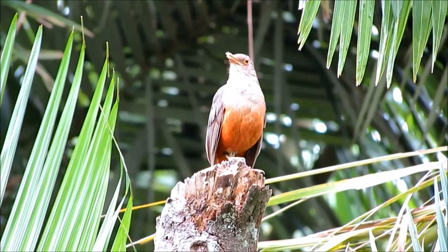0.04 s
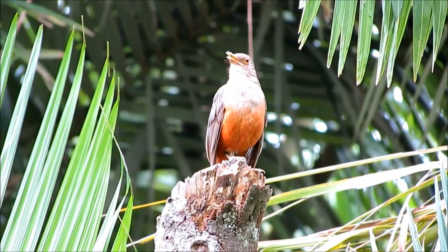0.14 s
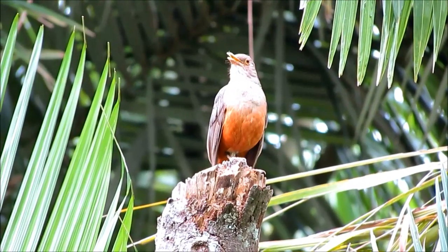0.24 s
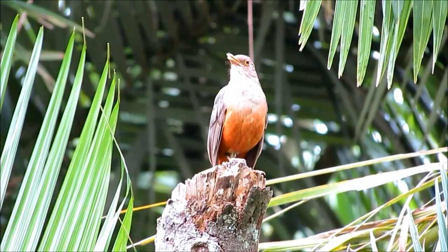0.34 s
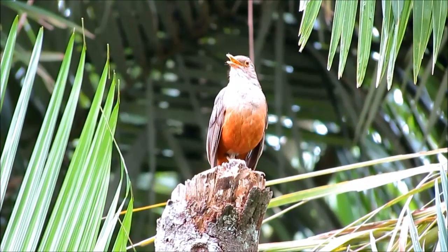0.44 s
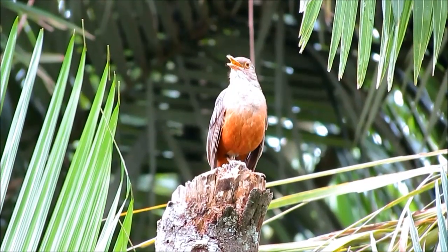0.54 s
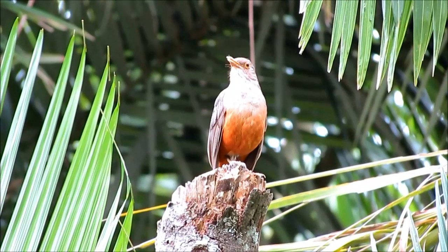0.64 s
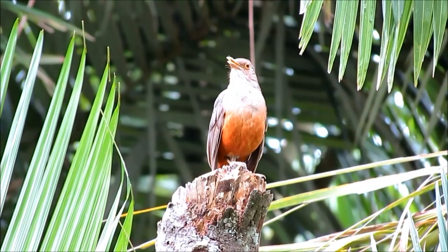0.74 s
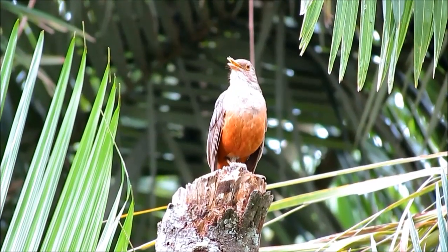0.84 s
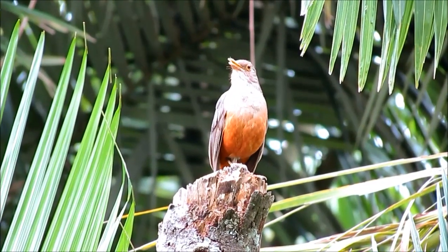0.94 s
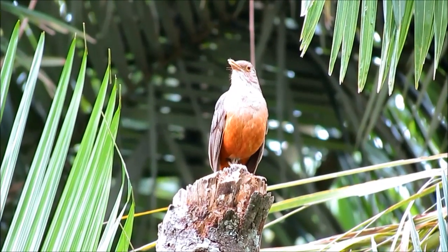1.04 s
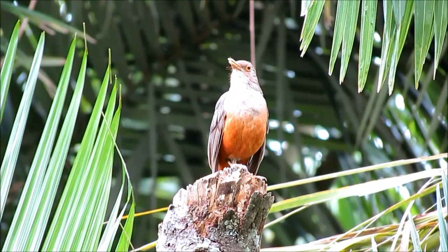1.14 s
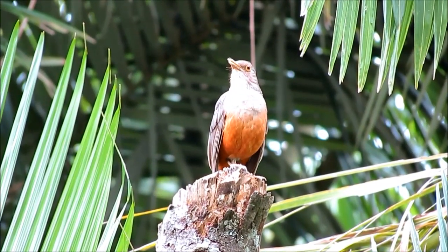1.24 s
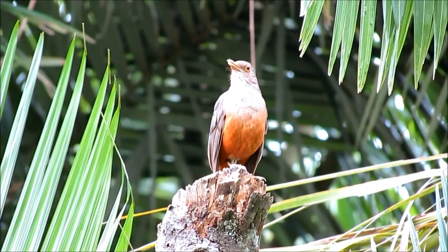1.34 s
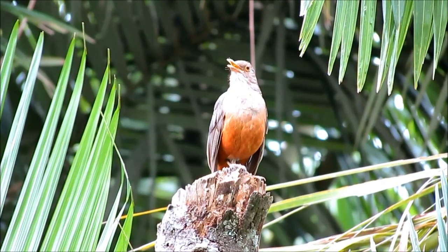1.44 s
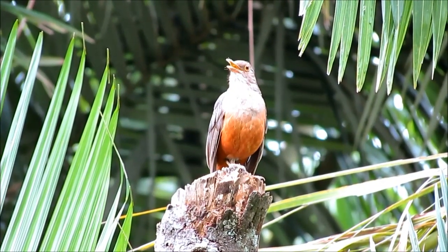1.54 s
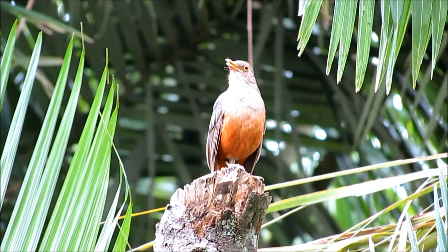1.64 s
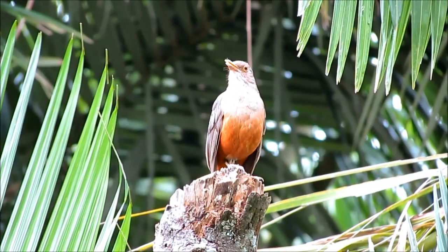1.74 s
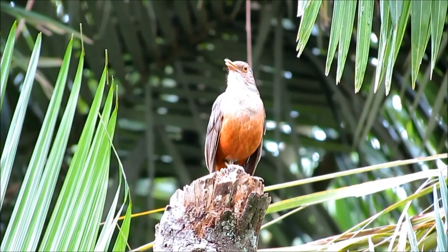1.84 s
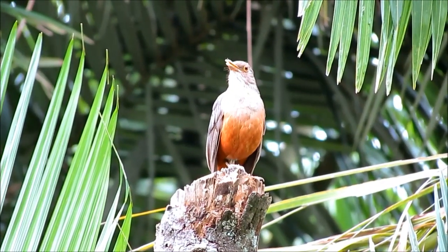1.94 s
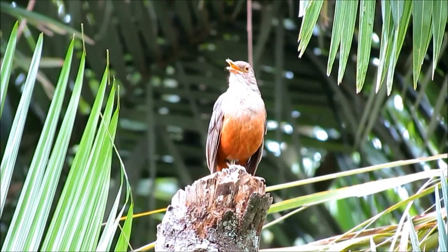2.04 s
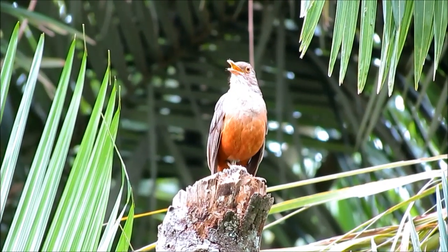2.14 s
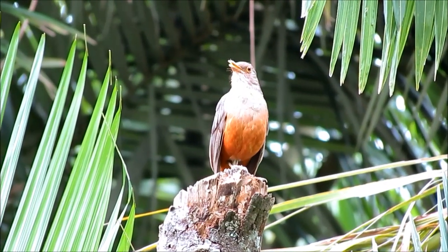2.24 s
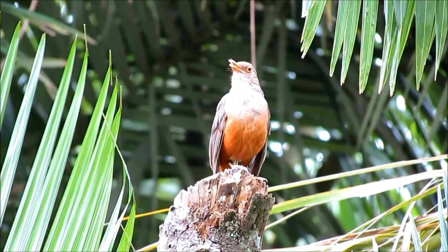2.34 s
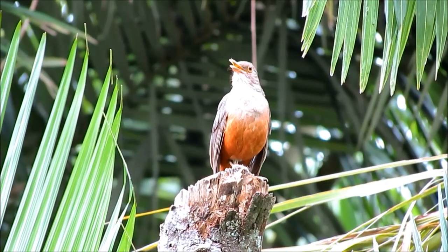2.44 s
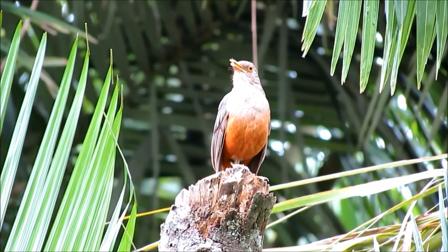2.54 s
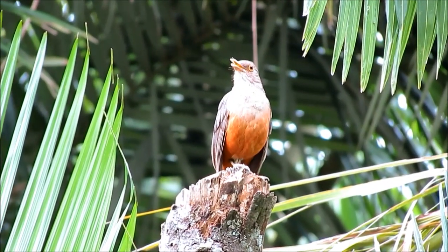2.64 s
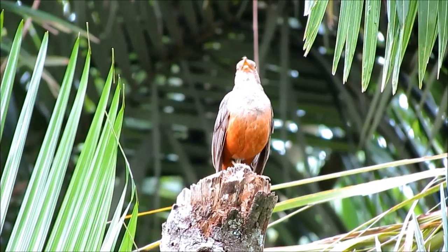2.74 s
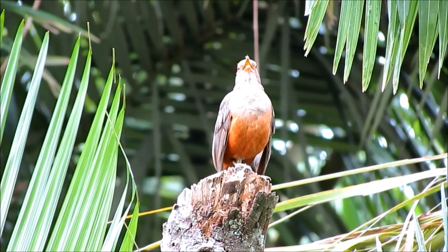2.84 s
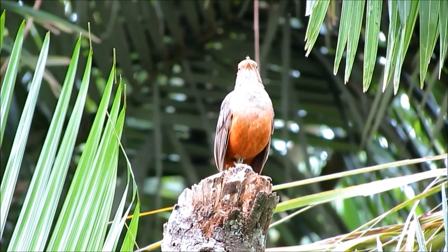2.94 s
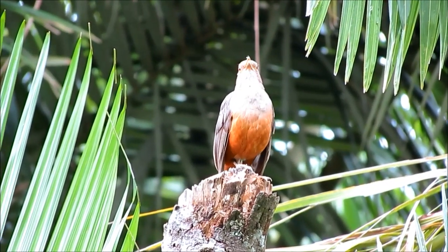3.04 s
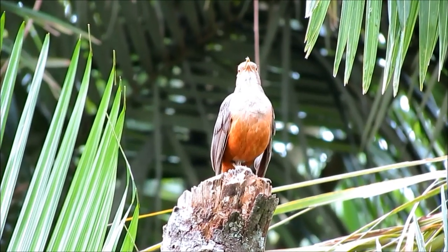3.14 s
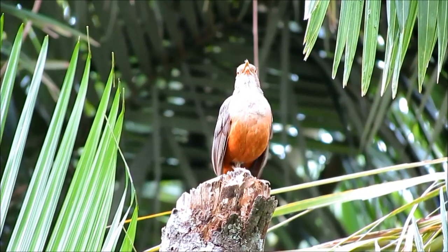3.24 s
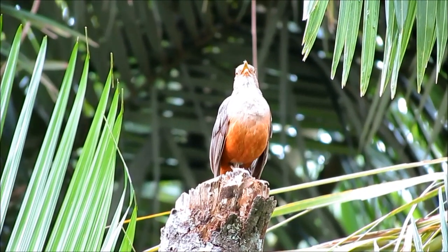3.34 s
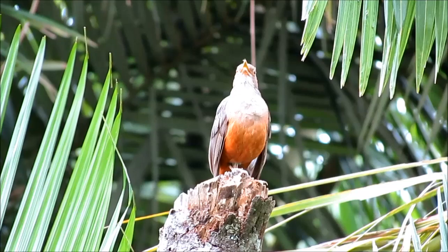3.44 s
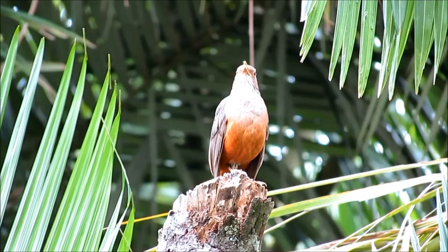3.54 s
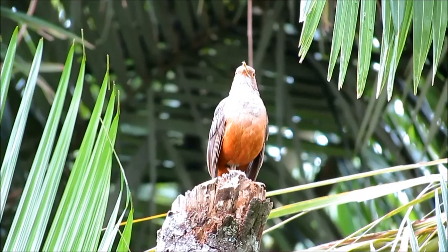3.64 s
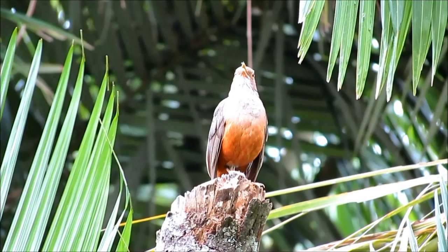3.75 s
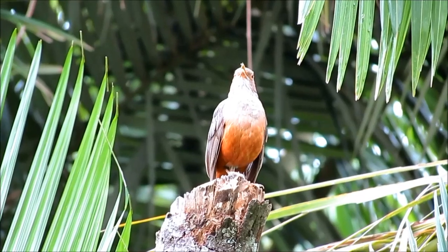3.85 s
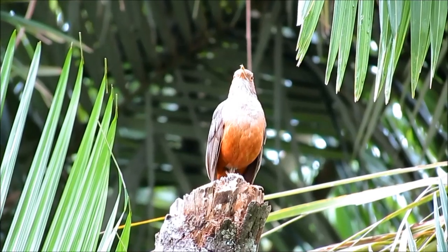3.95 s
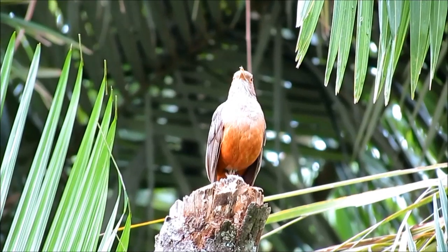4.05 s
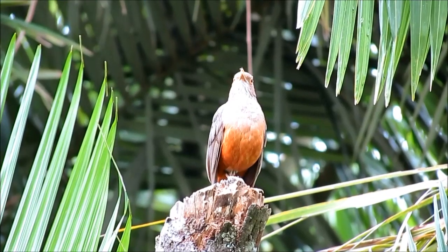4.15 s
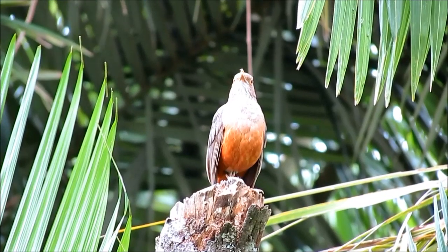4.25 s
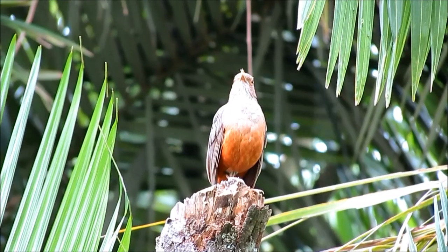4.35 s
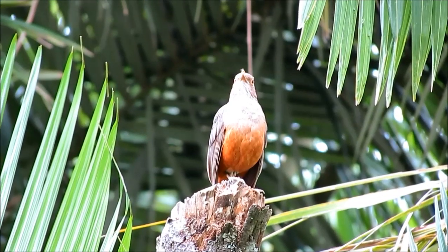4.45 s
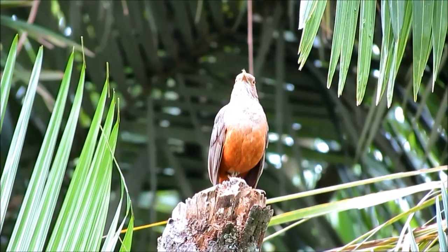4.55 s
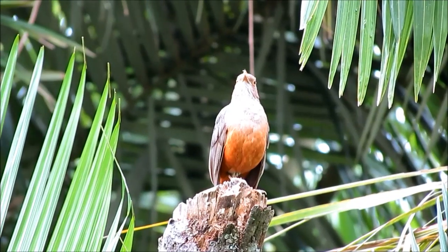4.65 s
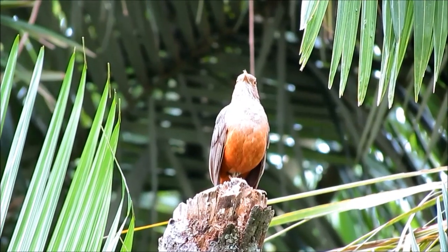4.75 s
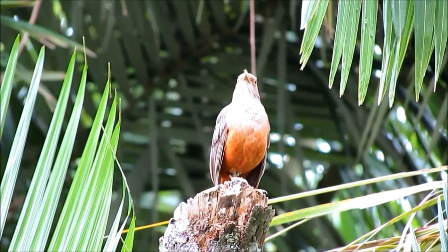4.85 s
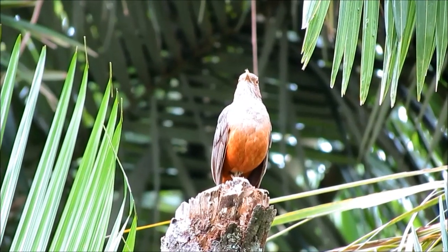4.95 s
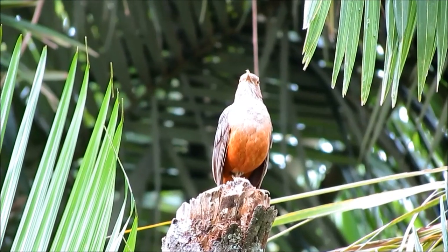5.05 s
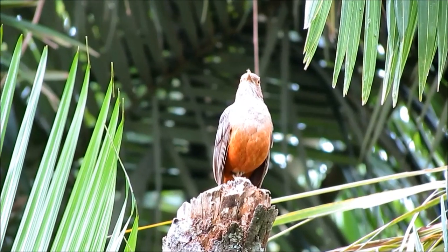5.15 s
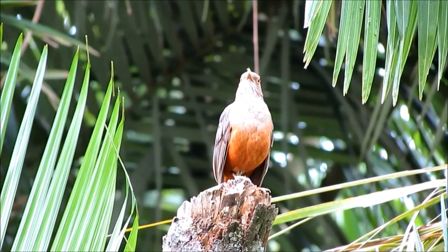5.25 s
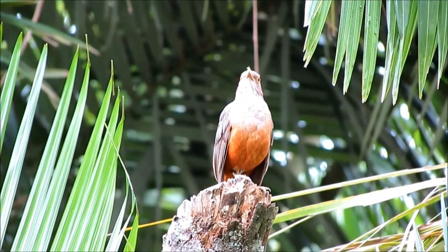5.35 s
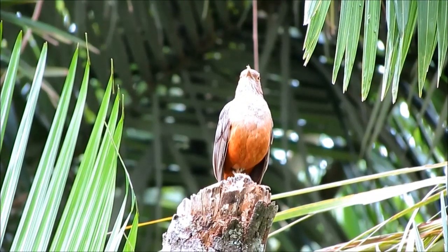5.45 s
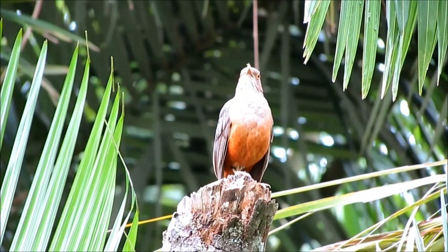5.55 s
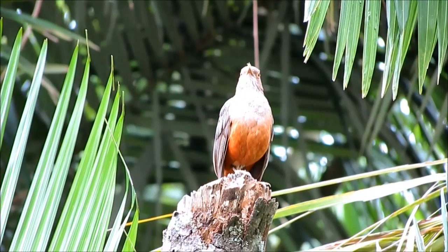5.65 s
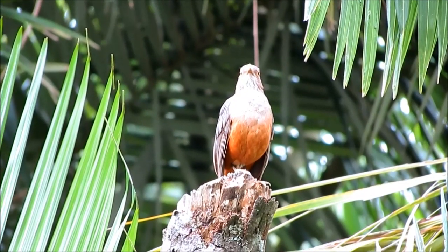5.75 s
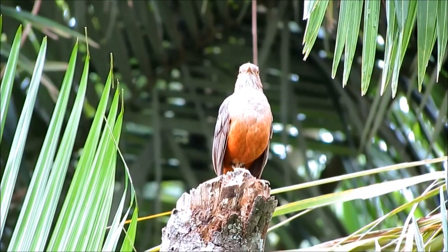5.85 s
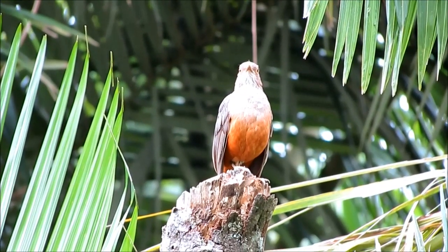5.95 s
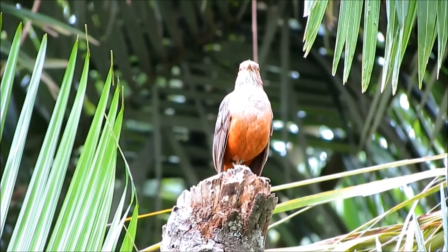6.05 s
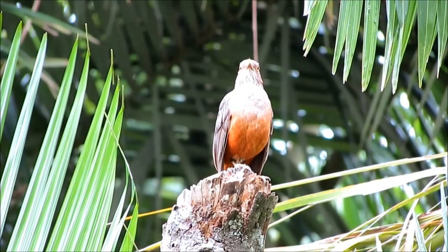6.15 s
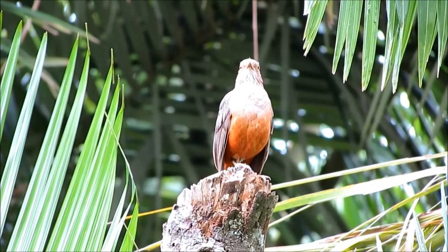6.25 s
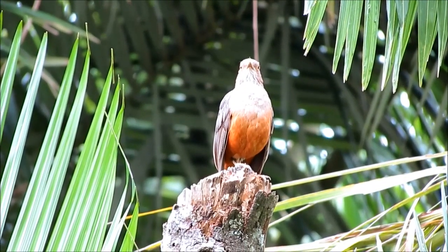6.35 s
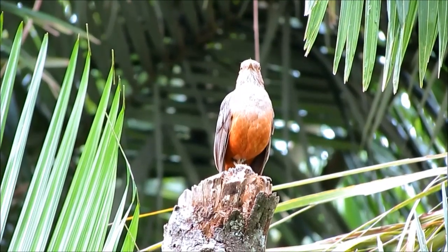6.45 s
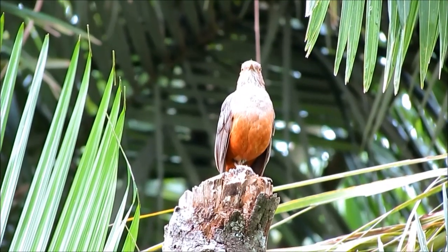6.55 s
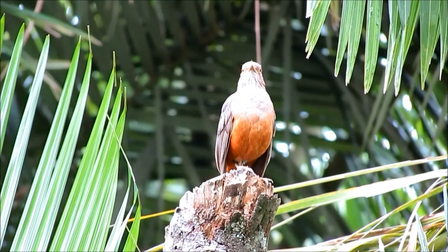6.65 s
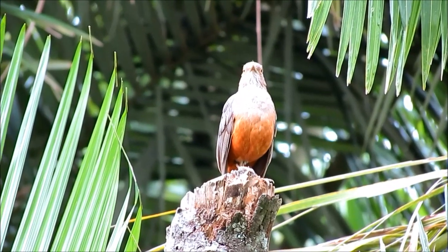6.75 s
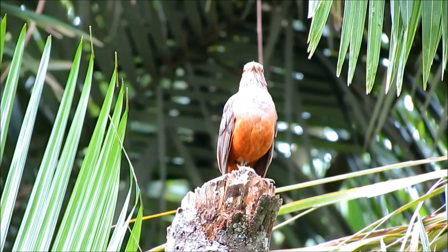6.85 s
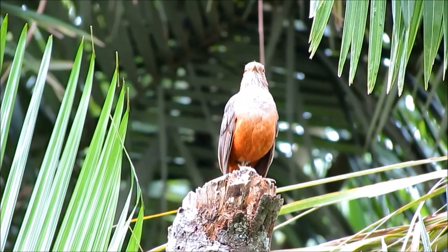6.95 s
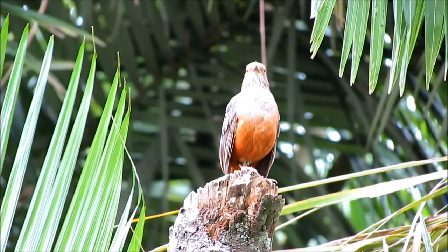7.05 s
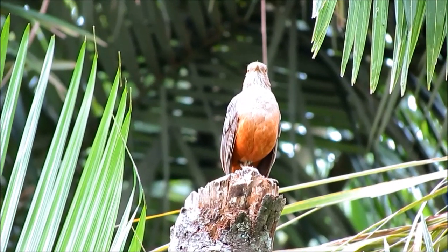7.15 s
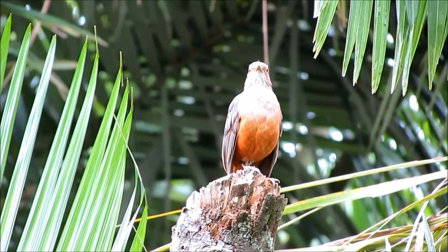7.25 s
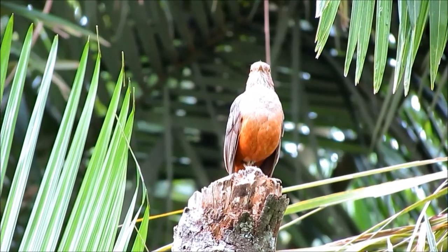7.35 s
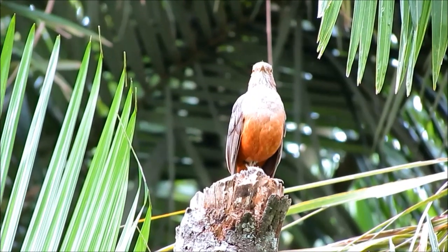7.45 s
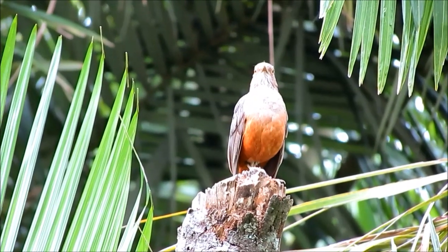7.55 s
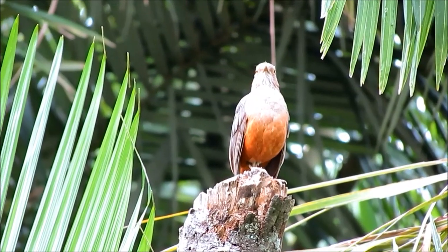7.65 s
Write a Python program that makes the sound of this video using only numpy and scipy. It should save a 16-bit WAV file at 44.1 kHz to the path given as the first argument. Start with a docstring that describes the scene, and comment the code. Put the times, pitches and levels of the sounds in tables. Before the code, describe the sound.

Outdoors among foliage, low airy hush lies under a fluting thrush whose slurred syllables follow with tiny gaps for nearly four seconds. Bright falling chips from small birds sound sharply at first, thin out, then take over after the song ends. A double hollow knock comes early and another late; occasional dry ticks, small distant yelps on the left and faint rapid twittering fill the stereo space, with short diffuse echoes.

```python
"""A thrush sings fluted, trilled notes (bent whistles) over thin, mostly falling chips of small birds (sine sweeps).
A small dog yelps some way off (harmonics plus rasp); knocks and dry clicks sound (coloured noise bursts).
Behind lie far twitter (fast slurs), faint far calls (sine glides) and the low hush of the yard (noise, hum).
Delayed copies of thrush and chips give the ground bounce; sparse decaying taps scatter all but the hush
off the foliage."""
import sys
import numpy as np
from scipy import signal
from scipy.fft import rfft, irfft, next_fast_len
from scipy.io import wavfile

SR = 44100
rng = np.random.default_rng(int(sys.argv[2]) if len(sys.argv) > 2 else 0)


def output_pcm(signal):
    """Save a mono or channel-first signal as 16-bit PCM at the path in sys.argv[1].

    Samples are clipped to [-1, 1] before scaling.
    """
    pcm = np.clip(np.atleast_2d(signal).T, -1, 1) * 32767
    wavfile.write(sys.argv[1], SR, np.round(pcm).astype(np.int16))


N = 339129
TIME = np.arange(N) / SR
GROUND_S = 0.0136  # extra travel time of the path off the ground


def amp(db):
    """Decibels to gain."""
    return 10 ** (np.asarray(db) / 20)


def unit(x):
    """Scales to rms 1."""
    return x / np.sqrt(np.mean(x ** 2) + 1e-20)


def read(points, hz):
    """Interpolates a table on a log-frequency axis."""
    f, value = np.transpose(points)
    return np.interp(np.log(hz + 1), np.log(f + 1), value)


def colour(x, spectrum):
    """Filters a sound by a dB spectrum, at rms 1."""
    size = x.shape[-1]
    padded = next_fast_len(size)
    gain = amp(read(spectrum, np.fft.rfftfreq(padded, 1 / SR)))
    return unit(irfft(rfft(x, padded) * gain, padded)[..., :size])


def drift(t, rate_hz):
    """Random values, rate_hz a second, joined by straight lines."""
    knots = rng.standard_normal(4096)
    return np.interp((t - t[0]) * rate_hz, np.arange(len(knots)), knots)


def sine(hz):
    """Sine that follows a pitch curve."""
    return np.sin(2 * np.pi * np.cumsum(hz) / SR)


def fall(t, t60_s):
    """Exponential decay, 60 dB in t60_s."""
    return np.exp(-np.log(1000) * t / t60_s)


def pan(db):
    """Left and right gains for a level difference; positive is left."""
    return unit(amp([[db / 2], [-db / 2]]))


def add(mix, s, sound):
    """Mixes a sound in at time s."""
    part = mix[..., max(round(s * SR), 0):][..., :sound.shape[-1]]
    part += sound[..., :part.shape[-1]]


def delayed(x, s):
    """The sound s seconds later."""
    return np.pad(x, ((0, 0), (max(round(s * SR), 0), 0)))[:, :N]


def envelope(t, attack_s, release_s, change_db):
    """Soft attack, a hold that swells or fades through 0 dB at its middle, soft release."""
    ramp = np.minimum(t / attack_s, (t[-1] - t) / release_s)
    gate = np.sin(np.pi / 2 * np.clip(ramp, 0, 1)) ** 2
    return gate * amp(change_db * (t / t[-1] - .5))


# decay of the yard: f/Hz, t60/s
YARD_T60 = [(300, 1), (1100, 0.9), (2300, 0.53), (5000, 0.57), (8000, 0.43), (14000, 0.29)]


def foliage(x, near_db, far_db, near_t60_s, first_s=0.0055, shared=0.56):
    """Sparse scatter: nearest leaves share one decay, the whole yard decays by frequency."""
    t = np.arange(SR) / SR
    shape = (2, 3, SR)  # far and near; left, right and shared
    taps = rng.standard_normal(shape) * (rng.random(shape) < .1) * (t > first_s)
    taps = taps[:, :2] + shared * taps[:, 2:]  # part reaches both sides alike
    hz, at_s, z = signal.stft(taps[0], SR, nperseg=256)
    decay = amp(-60 * at_s / read(YARD_T60, hz)[:, None])
    far = signal.istft(z * decay, SR, nperseg=256)[1][:, :SR]
    near = taps[1] * fall(t, near_t60_s)
    echo = (amp(near_db) * unit(near) + amp(far_db) * unit(far)) / np.sqrt(SR)
    return signal.fftconvolve(x, echo, axes=1)[:, :N]


# air spectrum: f/Hz, relative level/dB per Hz
HUSH_SPECTRUM = [(12, -44), (20, -20.5), (49, 3.5), (70, 1.5), (119, -2), (404, -9), (900, -14.5),
                 (1230, -18), (4310, -23.5), (5690, -14.5), (7310, -29), (11700, -32.5), (15500, -38)]
# likeness of the two sides: f/Hz, left-right correlation
HUSH_CORRELATION = [(30, 0.57), (70, -0.64), (170, -0.58), (400, -0.66), (1000, -0.25), (4000, 0.14),
                    (12000, -0.098)]
# low hum: f/Hz, drift rate/Hz, level/dB
HUM_BANDS = [(46, 14, -67.5), (75, 6.7, -56.5)]


def hush(level_db=-45.5, flutter_db=0.57, flutter_hz=3.1):
    """Far town air as partly correlated noise, with a randomly wavering low hum."""
    size = next_fast_len(N)
    a, b = rfft(rng.standard_normal((2, size)))
    same = read(HUSH_CORRELATION, np.fft.rfftfreq(size, 1 / SR))
    right = same * a + np.sqrt(1 - same ** 2) * b
    air = colour(irfft(np.array([a, right]), size)[:, :N], HUSH_SPECTRUM)
    hum = np.zeros((2, N))
    for hz, drift_hz, db in HUM_BANDS:
        for side in hum:
            waver = drift(TIME, drift_hz) + 1j * drift(TIME, drift_hz)
            side += amp(db) * (waver * np.exp(2j * np.pi * hz * TIME)).real
    return air * amp(level_db + flutter_db * drift(TIME, flutter_hz)) * pan(-0.63) + hum


# far single tones: t/s, length/s, first f/Hz, last f/Hz, level/dB
FAR_TONES = [(0, 0.38, 1425, 1345, -62), (1.574, 0.027, 1086, 1050, -53), (1.16, 0.17, 540.5, 554, -59.5),
             (1.549, 0.24, 556.4, 543, -62.5), (3.532, 0.26, 534, 551, -65.5), (4.03, 0.24, 526, 510, -66),
             (4.793, 0.13, 4820, 3400, -61), (5.058, 0.23, 4980, 5000, -61.5),
             (6.7, 0.033, 2470, 2420, -67)]


def far_birds():
    """Low coos and thin glides: soft sine tones that swell and fade."""
    voice = np.zeros(N)
    for s, length_s, first_hz, last_hz, db in FAR_TONES:
        hz = np.linspace(first_hz, last_hz, round(length_s * SR))
        swell = signal.windows.tukey(len(hz), .5)
        add(voice, s, np.sqrt(2) * amp(db) * swell * sine(hz))
    direct = voice * pan(0)
    return direct + foliage(direct, near_db=0, far_db=-2, near_t60_s=.2)


# run starts: t/s
TWITTER_STARTS = [1.381, 1.798, 2.199, 2.58, 3.099, 3.42, 4.02, 4.72, 5.53, 6.12, 6.46, 6.79, 7.13]


def twitter(peak_db=-50, length_s=0.18, rate_hz=44, top_hz=6200, bottom_hz=5100):
    """Far birds: runs of rapid downward sine slurs at a drifting rate."""
    cycle = np.cumsum(rate_hz * (1 + 0.12 * drift(TIME, 24))) / SR % 1
    hz = top_hz + (bottom_hz - top_hz) * cycle
    runs = np.zeros(N)
    for s in TWITTER_STARTS:
        add(runs, s, signal.windows.tukey(round(length_s * SR), .5))
    slurs = amp(peak_db) * runs * np.sin(np.pi * cycle) * sine(hz) * pan(0)
    return slurs + foliage(slurs, near_db=-8, far_db=-9, near_t60_s=.1)


def strikes(rows, body, side_db, echo_db):
    """Each blow is a noise burst in the colour of the struck body: brief rise, exponential decay."""
    out = np.zeros((2, N))
    t = np.arange(SR // 4) / SR
    for s, db, rise_s, t60_s, pitch in rows:
        common, left, right = rng.standard_normal((3, len(t)))
        shifted = [(hz * pitch, level) for hz, level in body]
        burst = colour(common + 0.59 * np.array([left, right]), shifted)
        add(out, s, amp(db) * burst * np.minimum(t / rise_s, 1) * fall(t, t60_s) * pan(side_db))
    return out + foliage(out, near_db=echo_db, far_db=echo_db - 22, near_t60_s=0.29)


# dry clicks: t/s, level/dB before rise and decay, rise/s, t60/s, pitch factor on the body
CLICK_BLOWS = [(1.115, -19.5, 0.00067, 0.0063, 0.91), (2.5, -23, 0.0011, 0.01, 1.16),
               (2.95, -42, .001, 0.01, 2.7), (3.034, -35.5, .005, 0.06, 1.25),
               (5.992, -30.5, .002, 0.031, 1.4), (6.381, -34, 0.0038, 0.028, 1.86),
               (7.001, -34.5, 0.0017, 0.029, 1.9)]
# struck body: f/Hz before the pitch factor, relative level/dB
CLICK_SPECTRUM = [(800, -18), (2500, 8.5), (4200, 11), (6000, 8.5), (9000, -1), (12000, -1), (15500, -3)]


def clicks():
    """Dry clicks: bursts strongest at a few kHz."""
    return strikes(CLICK_BLOWS, CLICK_SPECTRUM, side_db=0.5, echo_db=1)


# hollow knocks: t/s, level/dB before rise and decay, rise/s, t60/s, pitch factor on the body
KNOCK_BLOWS = [(.412, -25, .003, 0.21, 0.94), (.416, -15.5, 0.0024, .06, 2.75),
               (.423, -13.5, .002, 0.044, 2.1), (5.485, -24.5, 0.0015, .06, 1.02),
               (5.491, -19.5, 0.0062, 0.07, 1.04), (5.554, -33, 0.01, 0.073, 1.64)]
# struck body: f/Hz before the pitch factor, relative level/dB
KNOCK_SPECTRUM = [(90, -52), (290, -5), (400, -3), (550, 5.5), (740, -10.5), (1050, 0), (1500, -8),
                  (1900, -13), (2500, -16), (6000, -22), (12000, -36)]


def knocks():
    """Hollow knocks: bursts with a strong low resonance, shifted per blow."""
    return strikes(KNOCK_BLOWS, KNOCK_SPECTRUM, side_db=-2.5, echo_db=-5)


# yelps: centre t/s, length/s, first f/Hz, last f/Hz (both before arch and jitter),
# level/dB before the swell, roughness/0-1, brightness/dB per octave
DOG_YELPS = [ (2.11, .11, 534, 524, -49, .5, -4.5), (3.899, 0.033, 501, 510, -40, 0.14, -11),
             (3.931, 0.033, 534, 571, -28.5, 0.26, 3), (3.965, .055, 563, 570.4, -29.5, 0.17, 0.5),
             (4.703, .18, 720, 681, -55, 0.48, 2.5), (6.306, 0.17, 750, 762, -55.5, 0.48, -0.5),
             (7.534, 0.046, 538, 500, -43, 0.37, -7), (7.567, 0.071, 496, 500, -38, 0.58, -1),
             (7.598, 0.038, 495.7, 512.6, -31, .03, 4), (7.622, 0.077, 514, 510, -33.5, 0.14, 1), ]
# throat: f/Hz, relative level/dB before brightness
THROAT_SPECTRUM = [(500, -32.5), (750, -15), (1050, 5), (1280, -6.5), (1620, -1.5), (2150, -3.5),
                   (2550, -13.5), (3050, -7.5), (3800, -32), (8000, -26)]
# hoarse noise: f/Hz, relative level/dB before brightness
RASP_SPECTRUM = [(700, -18.5), (1100, -2.5), (3300, -6), (4000, -17), (12000, -47)]


def dog(arch=0.023, jitter=0.027):
    """Short arched calls: throat-filtered harmonics plus a pitch-pulsed rasp, with strong echo."""
    voice = np.zeros(N)
    for s, length_s, first_hz, last_hz, db, rough, bright_db in DOG_YELPS:
        u = np.linspace(-1, 1, round(length_s * SR))
        bend = 1 - arch * u ** 2 + jitter * drift(u * length_s / 2, 341)
        pitch_hz = np.linspace(first_hz, last_hz, len(u)) * bend
        phase = 2 * np.pi * np.cumsum(pitch_hz) / SR
        throat = [(hz, level + bright_db * np.log2(hz)) for hz, level in THROAT_SPECTRUM]
        hoarse = [(hz, level + bright_db * np.log2(hz)) for hz, level in RASP_SPECTRUM]
        harmonics = sum(np.cos(k * phase + 2 * np.pi * rng.random()) for k in range(1, 14))
        folds = colour(harmonics, throat)
        rasp = colour(rng.standard_normal(len(u)) * (1 + np.cos(phase) / 2), hoarse)
        call = unit((1 - rough) * folds + rough * rasp)
        add(voice, s - length_s / 2, amp(db) * call * np.cos(np.pi / 2 * u) ** 2)
    echo = foliage(voice * pan(-3.5), near_db=0.5, far_db=-2.5, near_t60_s=0.37)
    return voice * pan(-9.5) + echo


# sweeps, 1-3 to a chip: t/s, length/s, half-glide time/s (before the glide is stretched to reach its end),
# first f/Hz, last f/Hz, peak level/dB before CHIP_LOUDNESS and fade, left-right/dB, echo/dB
CHIP_SWEEPS = [ (.02, 0.041, 0.029, 9830, 9450, -30.5, 2, 12.5),
               (0.034, 0.013, 0.012, 10050, 5740, -19, -3, 6.5),
               (0.091, 0.048, 0.022, 6560, 3540, -22, 2.5, 2), (.174, 0.02, 0.016, 8680, 5880, -21, 6, -3),
               (0.213, 0.043, 0.016, 4400, 3070, -35.5, 2, -2),
               (0.371, 0.025, 0.011, 5980, 4910, -21, 3, 1.5),
               (0.383, 0.048, 0.019, 6510, 4290, -34, 13, 10), (0.409, .085, .045, 5680, 4966, -24, 2, 1),
               (0.481, .058, 0.033, 8550, 4630, -37.5, 7, 12.5),
               (0.694, 0.012, .008, 6400, 8580, -18, -16, 5),
               (0.706, 0.018, .012, 8490, 5860, -14.5, -1, -3),
               (.743, 0.056, 0.026, 4500, 3434, -22.5, 4, -3),
               (0.939, 0.011, .007, 6630, 8420, -19, -1, 3.5),
               (.947, 0.017, 0.012, 8590, 4410, -16, -.5, 1),
               (0.967, 0.056, 0.024, 4320, 3005, -28.5, 1, -2),
               (1.712, 0.014, 0.0087, 5970, 7720, -38.5, -4, 4),
               (1.722, 0.018, .012, 7780, 4550, -38, 1, 3),
               (3.029, 0.014, 0.018, 7420, 4530, -41.5, -4, 17),
               (3.729, 0.021, 0.011, 9360, 6520, -41, 3.5, 2.5),
               (3.766, 0.038, 0.011, 9900, 6300, -39.5, -2, -3),
               (3.929, .027, 0.015, 10200, 7400, -37.5, 3, -4),
               (4.195, 0.028, 0.0084, 6900, 5090, -28, 3, -2.5),
               (4.249, .029, 0.011, 8500, 4300, -31.5, 3, -3),
               (4.493, 0.026, 0.014, 8840, 9330, -39.5, 10, 0),
               (4.5, 0.016, 0.0089, 5220, 7890, -32, -7, -1),
               (4.506, 0.035, 0.011, 7780, 4000, -33, 6, -1.5),
               (4.902, 0.023, 0.014, 6640, 3760, -29.5, 5, -2),
               (5.019, 0.026, 0.0084, 10050, 5100, -23.5, 3, -1.5),
               (5.034, 0.042, 0.014, 5026, 5006, -27.5, 12, -2.5),
               (5.295, 0.014, 0.012, 8850, 4900, -23.5, 8, -2.5),
               (5.356, 0.016, 0.016, 9600, 7000, -23.5, 2.5, 0),
               (5.374, 0.014, .01, 9600, 5860, -24.5, 4, -17),
               (5.386, 0.031, 0.02, 5730, 3700, -24, 5, -1.5),
               (5.697, 0.037, 0.012, 8280, 3940, -24.5, 9, -2),
               (5.747, 0.031, .02, 4040, 3140, -33.5, -1, -2.5),
               (5.914, 0.027, 0.017, 7900, 3930, -21.5, 7, -1.5),
               (5.991, 0.018, 0.013, 8900, 4230, -19, 5, -2.5),
               (6.742, .013, 0.0066, 5690, 7420, -23, -17, -10),
               (6.75, 0.016, 0.013, 7600, 3940, -32.5, -7, -16),
               (7.32, 0.056, 0.021, 6360, 4960, -46, 8, 7.5), (7.351, 0.084, .02, 7220, 7620, -51, 9, 10.5),
               (7.377, 0.032, .016, 7800, 4720, -38, 4, 5), ]
# loudness by pitch: f/Hz, level/dB
CHIP_LOUDNESS = [(3000, 1), (4200, -4.5), (5500, -4.5), (7000, -3.5), (8300, -5.5), (10000, -13.5)]
# lag of the right side: f/Hz, phase/rad
CHIP_LAG = [(4300, 1.65), (5500, 0.38), (7300, 4.08), (10000, 4.8)]


def small_birds(waver=0.014, knee=2.1, attack_s=0.0059, release_s=0.0013, fade_db=-11.5):
    """Sine sweeps that bend, plunge or climb, level out and fade; ground doubles, leaves smear."""
    direct, scattered = np.zeros((2, 2, N))
    for start, length_s, half_s, first_hz, last_hz, db, side_db, echo_db in CHIP_SWEEPS:
        t = np.arange(0, length_s, 1 / SR)
        glide = 1 - 1 / (1 + (t / half_s) ** knee)  # knee: sharpness of the bend
        hz = first_hz + (last_hz - first_hz) * glide / glide[-1]
        phase = 2 * np.pi * np.cumsum(hz * (1 + waver * drift(t, 898))) / SR
        loudness = amp(db + read(CHIP_LOUDNESS, hz)) * envelope(t, attack_s, release_s, fade_db)
        chip = loudness * np.sin([phase, phase - read(CHIP_LAG, hz)])
        add(direct, start, chip * pan(side_db))
        add(scattered, start, chip * pan(side_db / 2) * amp(echo_db))
    bounce = amp(-3) * delayed(direct, GROUND_S)
    echo = foliage(scattered, near_db=0, far_db=-1, near_t60_s=0.17, first_s=0.0075, shared=0.37)
    return direct + bounce + echo


# syllables: t/s, length/s, attack/s, first f/Hz, middle f/Hz, last f/Hz (before waver and flicks),
# level/dB of the fundamental at mid-length before the trill dip, swell over the length/dB, overtone offset/dB
SYLLABLES = [ (0, 0.032, 0.00094, 2496, 2632, 2670, -39.5, -6, 14),
             (0.12, 0.055, 0.0078, 2155, 2040, 1940, -33.5, 15, 17),
             (0.174, 0.13, 0.0047, 2440, 2143, 2145, -27, 5, -5),
             (0.443, 0.19, 0.03, 3323, 2493, 2530, -23.5, 9.5, -2.5),
             (0.567, 0.069, 0.015, 2980, 3380, 3800, -33.5, 6, -20),
             (0.791, 0.15, 0.0068, 2206, 2056, 2098, -30, -4, -10),
             (0.913, 0.076, 0.0068, 2025, 2201, 2264, -21, 5.5, 2.5),
             (1.138, 0.089, 0.0074, 1397, 1540, 1690, -43.5, 15, -1),
             (1.205, 0.095, 0.005, 1720, 1852, 1530, -32, -4.5, 3.5),
             (1.474, 0.13, 0.019, 2150, 2013, 2144, -28.5, 11.5, -6),
             (1.603, 0.043, 0.01, 2225, 2233, 2360, -20.5, 2, -1),
             (1.834, 0.052, 0.04, 1553, 1740, 1800, -33.5, 3, 6.5),
             (1.88, 0.0063, 0.0014, 1880, 2430, 2070, -26, -7, 1),
             (1.906, 0.063, 0.0083, 1653, 1745, 1983, -33.5, 4.5, 2),
             (1.946, 0.04, 0.0023, 2276, 2133, 1870, -36, 7, -4),
             (2.087, 0.13, 0.026, 3344, 2410, 2360, -24, 13, -3),
             (2.216, 0.044, 0.0099, 2570, 2660, 2594, -25, -7, 3.5),
             (2.379, 0.053, 0.026, 1925, 2015, 1935, -27.5, 21, -6),
             (2.443, 0.012, 0.0043, 1920, 2486, 2520, -22, -9, -2),
             (2.451, 0.12, 0.005, 2374, 2163, 2099, -23.5, 3, -0.5),
             (2.729, 0.21, 0.033, 3360, 2494, 2495, -21.5, 6, -0.5),
             (3.11, 0.08, .045, 1643, 1753, 1616, -33, -3, 6),
             (3.176, 0.019, 0.0041, 1630, 2410, 2720, -30.5, 3, -10),
             (3.187, 0.035, 0.0055, 2390, 2055, 1970, -25.5, -4, 3),
             (3.214, 0.091, 0.0076, 1949, 2098, 2092, -27, 8.5, 4.5),
             (3.364, 0.041, 0.021, 2295, 2402, 2290, -24.5, 7, -6),
             (3.401, 0.132, 0.019, 2243, 2187, 2204, -17.5, -1.5, -3),
             (3.741, 0.021, 0.0087, 2380, 2410, 2490, -30.5, 13, -6),
             (3.754, 0.02, 0.0033, 2360, 3120, 3980, -38.5, -3, 0),
             (3.784, 0.033, 0.0085, 2156, 2152, 2200, -32, -5, 6), ]
# overtones: multiple of f, level/dB before the syllable's offset and BEAK_RESPONSE
WHISTLE_OVERTONES = [(2, -34), (3, -30.5), (4, -47.5), (5, -42), (6, -44.5)]
# colour of the overtones from throat and beak: f/Hz, gain/dB
BEAK_RESPONSE = [(3500, 5.5), (5200, -15), (6400, -7.5), (7400, 7), (10000, -0.5), (13000, -5), (16000, -4)]
# trills: first flick t/s, end t/s, flick rate/Hz, flick height/Hz before it shrinks, dip per flick/dB
FLICK_RUNS = [(1.477, 1.611, 44, 728, -2.5), (2.131, 2.22, 45, 555, -4), (3.403, 3.546, 54, 298, -10.5)]


def thrush(waver=0.0046, ground_db=-7, release_s=0.0096, lean=.6):
    """Near-pure whistle, one pitch arc a syllable; trill flicks lift the pitch and weaken the tone."""
    voice, lift_hz, dip_db = np.zeros((3, N))
    for start, end, rate_hz, height_hz, flick_db in FLICK_RUNS:
        t = np.arange(0, end - start, 1 / SR)
        turn = 2 * np.pi * rate_hz * t
        leaning = turn + lean * (np.cos(turn) - 1)  # rises faster than it falls
        flick = np.abs(np.cos(leaning / 2)) ** 3 * signal.windows.tukey(len(t), .06)
        add(dip_db, start, flick_db * flick)
        add(lift_hz, start, height_hz * flick * (1 - t / t[-1] / 2))  # shrinks to half
    for start, length_s, attack_s, first_hz, middle_hz, last_hz, db, swell_db, overtones_db in SYLLABLES:
        t = np.arange(0, length_s, 1 / SR)
        parabola = np.polyfit([0, .5, 1], [first_hz, middle_hz, last_hz], 2)
        arc_hz = np.polyval(parabola, t / length_s)
        hz = arc_hz * (1 + waver * drift(t, 368)) + np.interp(start + t, TIME, lift_hz)
        phase = 2 * np.pi * np.cumsum(hz) / SR
        tone = np.sin(phase)
        for k, level in WHISTLE_OVERTONES:
            tone += amp(level + overtones_db + read(BEAK_RESPONSE, k * hz)) * np.sin(k * phase)
        loudness = amp(db + np.interp(start + t, TIME, dip_db))
        loudness = loudness * envelope(t, attack_s, release_s, swell_db)
        add(voice, start, np.sqrt(2) * loudness * tone)
    direct = voice * pan(-10.5)
    bounce = amp(ground_db) * delayed(direct, GROUND_S)
    return direct + bounce + foliage(voice * pan(-2.2), near_db=-1, far_db=-7.5, near_t60_s=0.16)


def scene():
    """Sums the yard, background first."""
    background = hush() + far_birds() + twitter()
    return background + clicks() + knocks() + dog() + small_birds() + thrush()


def record(dry, edge_hz=15850):
    """Steep low-pass at edge_hz."""
    lowpass = signal.firwin(1023, edge_hz, window=("kaiser", 9), fs=SR)
    return signal.oaconvolve(dry, lowpass[None], "same")


dry = scene()
out = record(dry)
output_pcm(out)
```